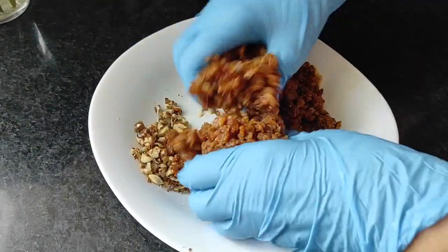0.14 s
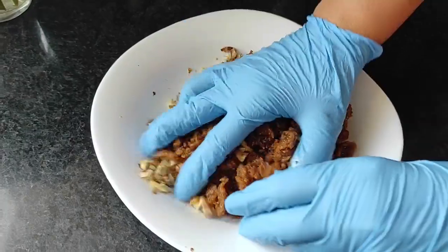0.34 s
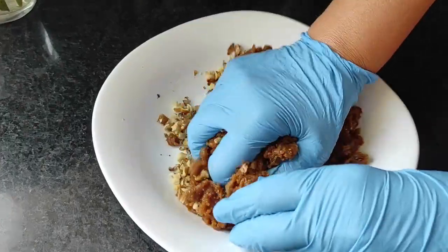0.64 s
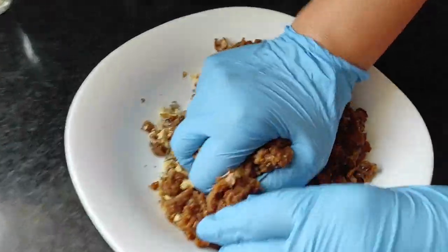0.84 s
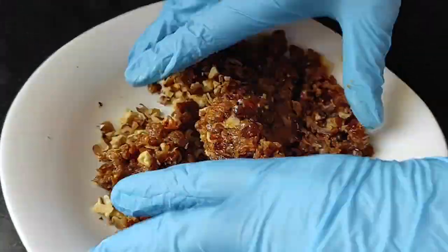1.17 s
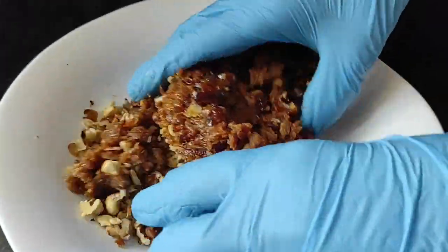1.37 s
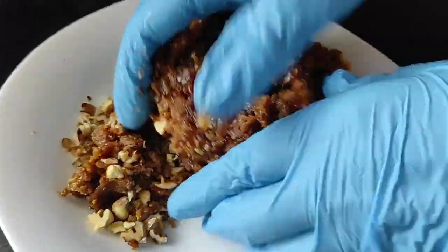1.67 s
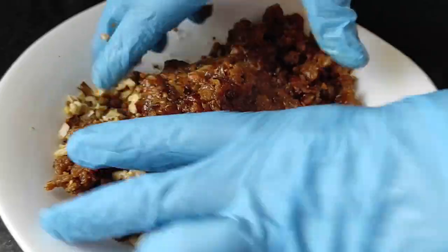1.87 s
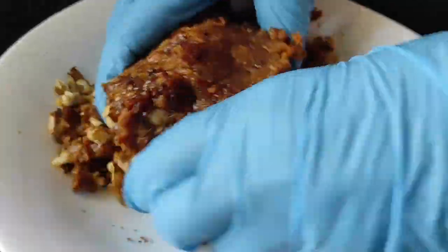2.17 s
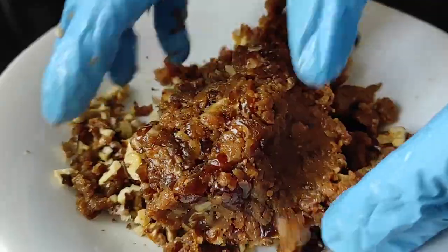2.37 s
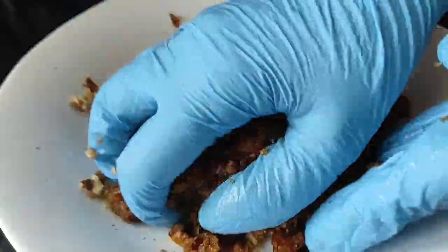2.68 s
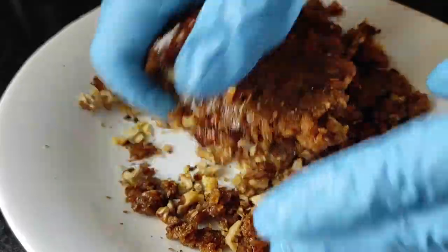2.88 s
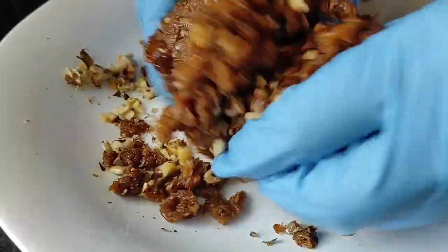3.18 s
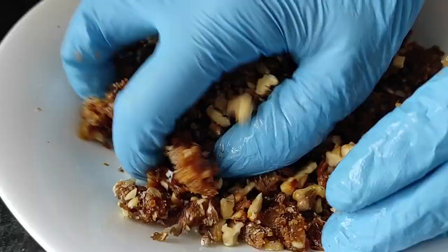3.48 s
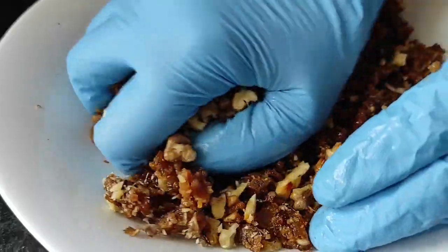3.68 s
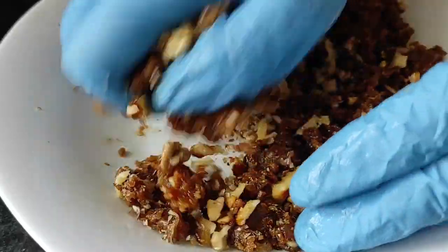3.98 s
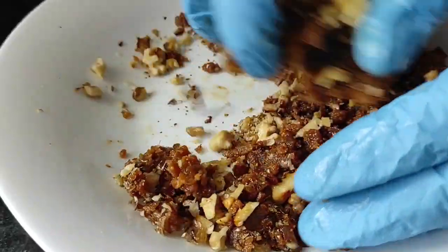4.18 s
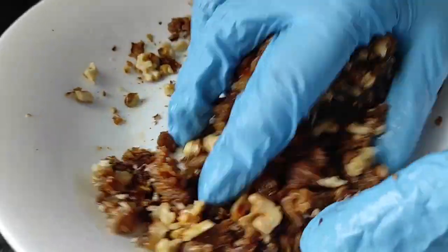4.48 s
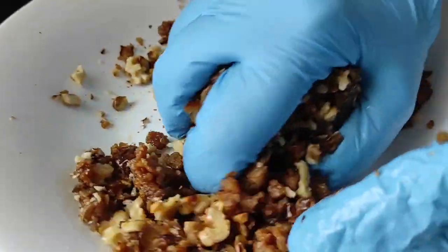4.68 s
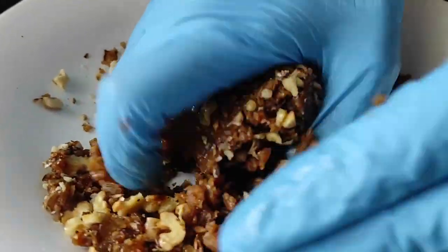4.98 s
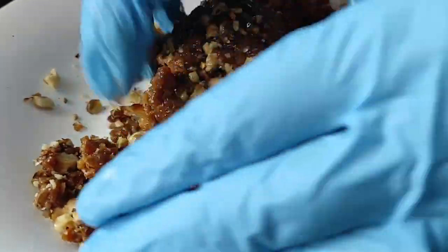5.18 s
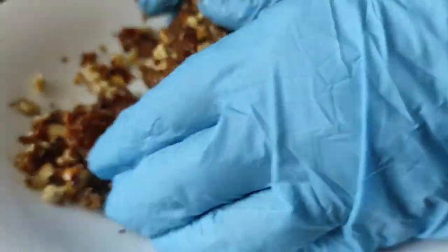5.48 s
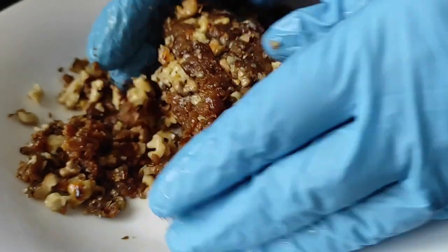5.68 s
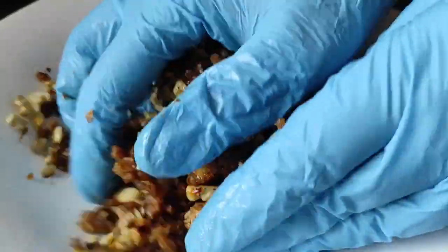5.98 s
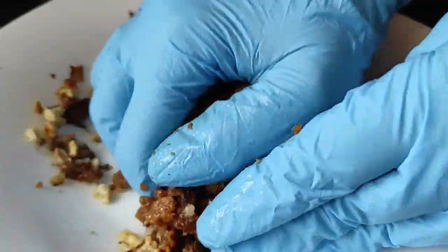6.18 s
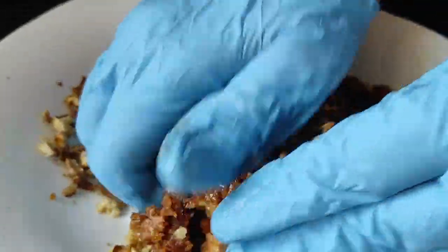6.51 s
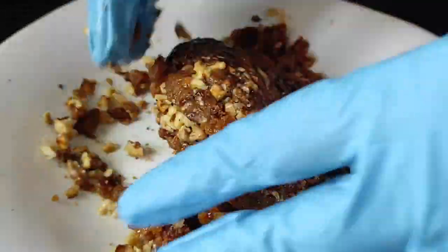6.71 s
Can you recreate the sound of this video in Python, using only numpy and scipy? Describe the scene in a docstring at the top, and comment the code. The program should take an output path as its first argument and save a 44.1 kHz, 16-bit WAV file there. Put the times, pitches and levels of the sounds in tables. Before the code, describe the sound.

Close stereo pickup in a quiet kitchen. Gloved fingers squeeze sticky paste in short, uneven strokes that fizz with tiny crackles and faint squelches. Crumbs scrape and nuts clink on a ceramic plate, and sticky threads tick as they part. Now and then the loose gloves rustle and snap with a new grip, loudest around five seconds, then softer kneading resumes.

```python
"""Gloved hands knead a sticky paste of dried fruit and nuts on a ceramic plate, close to the microphone in a kitchen.
From the start squeezes fizz with tiny sticky crackles (random impulses through spectra) over faint room air;
crumbs scrape and nuts clink (the plate's resonances), and threads tick (short pops) as they part.
From about 1 s each new grip rustles and snaps the loose gloves, and rubber creaks; then lumps thud softly,
rubber squeaks faintly (gliding tones) and hard nuts grind on the glaze. The loudest grip comes at about 5 s."""
import sys
import numpy as np
from scipy import signal
from scipy.fft import rfft, irfft, next_fast_len
from scipy.io import wavfile
from scipy.ndimage import map_coordinates

SR = 44100
rng = np.random.default_rng(int(sys.argv[2]) if len(sys.argv) > 2 else 0)


def digitize_waveform(pressure):
    """Quantize a signal to 16-bit integers and store it at the path in sys.argv[1].

    Rows of a 2-D input are taken as channels; values are limited to [-1, 1].
    """
    field = np.atleast_2d(pressure).T
    bounded = np.clip(field, -1, 1)
    quanta = np.round(bounded * 32767).astype(np.int16)
    wavfile.write(sys.argv[1], SR, quanta)


N = 302085

# Levels in the tables are relative; each source trims them before the mix.
# the air of the still kitchen: (frequency [Hz], density [dB per Hz])
AIR = [(20, 11), (50, -4), (100, -4), (200, -2), (330, -6), (600, -13.5), (1200, -18), (3000, -20.5),
       (6000, -12), (9000, -18.5), (10500, -36), (15500, -53)]
AIR_DB = -66.5
# how alike the air is at left and right: (frequency [Hz], likeness [0-1])
AIR_ALIKE = [(60, 0.42), (250, 0.74), (700, 0), (2000, 0)]
# the faint low drone, which steps up once: (frequency [Hz], density [dB per Hz])
DRONE = [(50, -12), (73, 8), (105, -33), (300, -64)]
DRONE_DB, DRONE_STEP_DB, DRONE_STEP_S = -84.5, 10, 4.03
# boom of the counter: (frequency [Hz], density [dB per Hz])
BOOM = [(110, -21), (160, 2), (215, -2.5), (330, -27.5)]
BOOM_DB, BOOM_REST_DB = -10.5, -73.5  # relative to the blows on the plate, and under the hands' bare weight
# the fingers squeeze the paste: (start [s], length [s], crackle level [dB], growth over the squeeze [dB],
# fizz relative to crackle [dB], squelch relative to crackle [dB])
SQUEEZES = [(-0.03, 0.35, -55.5, -16, -14, -7), (0.346, 0.2, -59, 5.5, -2, -11),
            (0.58, 0.26, -54.5, -3, -9, -16), (1.084, 0.094, -82, 0, -25, 4),
            (1.302, 0.22, -57.5, -1, -9, -6.5), (1.558, 0.26, -66, 5, -11, 3),
            (2.024, 0.22, -55, -5.5, -6.5, -17), (2.24, 0.15, -62, 0, -8, -7),
            (2.512, 0.23, -61.5, 8.5, -9.5, -9), (2.943, 0.26, -60.5, 2.5, -16, -3),
            (3.215, 0.29, -57, -2.5, -21, -3.5), (3.559, 0.27, -55, 2, -10, -12),
            (4.018, 0.12, -60, 4.5, -16, -3), (4.21, 0.047, -73, 12, -28, -1),
            (4.357, 0.031, -55.5, 1.5, -9, -19), (4.458, 0.17, -61.5, 6.5, -12, -11),
            (4.631, 0.28, -57, 2.5, -13.5, -7.5), (5.13, 0.46, -66.5, 5, -8, -1),
            (5.515, 0.26, -72.5, 15, -13, -3), (5.864, 0.36, -62, 3.5, -6.5, -1.5),
            (6.18, 0.23, -63, 8, -22, -8), (6.676, 0.19, -69.5, -2, -13, 10.5)]
SQUEEZE_ATTACK_S, SQUEEZE_RELEASE_S = 0.024, 0.031
SQUELCH_REST_DB, CRACKLE_REST_DB = -69.5, -68  # the paste settles under resting hands, before trims
STICK_SLIP_DB = 2.5  # the rubber sticks and slips: spread of the level wobble
# crackle of paste peeling off rubber: (frequency [Hz], density [dB per Hz])
PASTE = [(400, -44), (900, -7), (1450, -1), (1900, 0.5), (3000, -1.5), (4400, -2.5), (5600, 1.5),
         (6700, 4.5), (7600, -1), (9000, -6), (10000, -22), (15500, -38)]
# highest fizz, also the sharp edge of pops: (frequency [Hz], density [dB per Hz])
FIZZ = [(7000, 2), (9500, 0.5), (12000, 4), (15500, 1)]
# squelch under the palm: (frequency [Hz], density [dB per Hz])
SQUELCH = [(90, 4.5), (170, -4), (400, -5.5), (700, -5.5), (1200, -7), (1800, -21), (3500, -56)]
# air pockets bursting in the paste: (frequency [Hz], density [dB per Hz])
WET = [(450, 0.5), (1000, 12), (2100, -15), (3200, 10.5), (4500, -31)]
# tail of the kitchen: (frequency [Hz], time to fall 60 dB [s])
KITCHEN = [(150, 0.81), (1500, 0.26), (6000, 0.39), (14000, 0.11)]
# crumbs dragged over the plate: (start [s], length [s], level [dB], upper resonances relative to it [dB])
SCRAPES = [(0.185, 0.1, -62, -1.5), (0.632, 0.23, -65, -8), (1.333, 0.27, -66.5, -1), (1.7, 0.2, -64, -6),
           (2.076, 0.12, -63.5, -3), (2.333, 0.073, -60.5, 0.5), (2.66, 0.31, -66, -6),
           (2.94, 0.57, -62.5, -8), (3.704, 0.061, -59.5, 5.5), (4.065, 0.045, -55, -15),
           (4.228, 0.029, -58, -23), (4.288, 0.085, -71, -17), (4.443, 0.19, -60.5, -7),
           (4.807, 0.12, -62, -2), (5.675, 0.089, -68, -8), (6.093, 0.1, -63, -1), (6.339, 0.073, -62.5, 2)]
# plate resonances damped by the hands, low: (frequency [Hz], width [Hz], level [dB])
DAMPED_LOW = [(2043, 170, 2)]
# plate resonances damped by the hands, high: (frequency [Hz], width [Hz], level [dB])
DAMPED_HIGH = [(3590, 230, -8), (4440, 160, -22), (6180, 140, -8)]
LOAD_DETUNE = 0.021  # the shifting weight of the hands moves these resonances up or down by at most this share
# nuts knocking the plate: (time [s], level [dB], low modes relative [dB], middle modes relative [dB],
# high modes relative [dB], strongest high mode [Hz], share of the full ring length [0-1])
CLINKS = [(0.194, -43, -4, -20, -19, 6400, 0.43), (0.2986, -40.5, -16, -9, -12, 5560, 0.4),
          (0.306, -32, -12, -3.5, -11, 5650, 0.12), (1.699, -54, 4, -20, -30, 6500, 0.32),
          (1.7122, -53, 0.5, -11, -28, 6500, 0.5), (1.7444, -35.5, -12, -8, -12, 6100, 0.36),
          (1.84, -39, -22, -8, -11, 5900, 0.16), (2.4678, -35.5, -23, -11.5, -7, 7330, 0.81),
          (2.5875, -42.5, -35, -23, -10.5, 7650, 0.7), (3.0552, -28, -8, -4.5, -8.5, 6040, 0.24),
          (3.4364, -37.5, -14, -31, -5, 7140, 0.48), (4.166, -37.5, -20, -21, -12.5, 6130, 0.33),
          (4.218, -28, -2.5, -9.5, -16.5, 6000, 0.21), (4.2268, -44, -9, -6, -13, 5900, 0.29),
          (4.238, -43.5, -2, -7, -22, 6000, 0.36), (4.2705, -43, -0.5, -31, -31, 5900, 0.44)]
# modes of the bare plate: (frequency [Hz], level when struck [dB], level when rubbed [dB],
# time to fall 60 dB [s])
PLATE = [(1065, -21, 2.5, 0.041), (2045, 12, 7.5, 0.087), (2710, 3, -6, 0.028), (3650, 8, 5, 0.1),
         (4070, 7.5, -30, 0.042), (4790, -6, 0, 0.054), (5460, -10, -7, 0.04), (5790, 16, 10, 0.11),
         (6020, 15.5, -14, 0.11), (6640, 19, 12, 0.065), (7220, 16, -13, 0.037), (8000, 12, 2, 0.086),
         (8000, 5, -14, 0.06), (9000, 4, -2, 0.045)]
SPOT_DB_PER_OCTAVE = 43  # the spot that is hit favours one high mode; its neighbours fall away by this much
# dry crack of each knock: gain relative to its high modes, decay, and rise of the whole knock
CRACK, CRACK_T60_S, KNOCK_RISE_S = 2.4, 0.02, 0.0004
# sticky threads parting: (time [s], peak level [dB], pitch [Hz], rise [s], sharp edge relative [dB])
TICKS = [(0.8308, -42, 6900, .00025, -29), (1.0258, -26.5, 6600, 0.00049, -24),
         (1.0645, -36.5, 5670, 0.00062, -32), (1.4175, -38, 6840, 0.00044, -20),
         (2.63, -37, 6360, 0.00024, -10), (2.6463, -34.5, 6640, 0.0018, 6),
         (2.8464, -24, 6200, 0.00023, -35), (2.8585, -27, 5700, 0.00016, -32),
         (3.146, -35.5, 5500, 0.00032, -42), (3.5185, -37, 6570, 0.00027, -5),
         (3.777, -36, 5870, 0.00022, -30), (4.072, -33.5, 7400, 0.0006, -26),
         (4.0833, -38, 6500, 0.00022, -8), (4.125, -36.5, 5760, 0.00024, -37),
         (4.308, -41, 4930, 0.00034, -39), (4.3798, -31.5, 4710, 0.0012, -26),
         (4.7427, -28.5, 6330, 0.0003, -13), (4.892, -32.5, 4960, 0.00035, -43),
         (5.065, -18.5, 5400, 0.0014, -46), (5.0634, -28, 6900, 0.0011, -43),
         (5.0705, -25, 6500, 0.00081, -40), (5.0785, -22, 5500, 0.00041, -40),
         (5.662, -43, 6960, 0.0031, -35), (6.2625, -39, 6200, 0.00043, -34),
         (6.3554, -43, 6200, 0.00064, 10)]
# the hands take a new grip: (start [s], length [s], rustle level [dB], growth [dB], settling length [s],
# settling level [dB], low flutter relative to rustle [dB], crinkle relative to rustle [dB])
GRIPS = [(0.969, 0.068, -48, -3.5, 0.22, -50.5, -2, -3.5), (2.812, 0.069, -47.5, 7, 0.18, -64, -5, -4),
         (3.974, 0.048, -55, 8, 0.21, -66, -0.5, -3.5), (5.055, 0.037, -29.5, -0.5, 0.3, -50.5, -16.5, -10),
         (6.585, 0.064, -39, -2.5, 0.23, -50.5, -6, -7)]
GRIP_ATTACK_S, GRIP_RELEASE_S = 0.012, 0.013
REACH_S, REACH_DB = 0.064, -62.5  # the glove rustles faintly as the hand reaches for each grip
REGRIP_S, REGRIP_LENGTH_S, REGRIP_DB = 0.091, 0.026, -54  # the fingers close a moment after the grip starts
SETTLE_FALL_DB = 15  # the rubber goes on settling after each grip, fading by this much
# rustle of the gloves: (frequency [Hz], density [dB per Hz])
GLOVE = [(400, -21), (750, -12), (950, -4), (1180, -3.5), (1420, 3.5), (1680, -6), (1980, 0), (2400, -11),
         (2900, -18.5), (3500, -19), (4200, -23), (7000, -39)]
# low flutter of slack rubber: (frequency [Hz], density [dB per Hz])
FLUTTER = [(60, -50), (160, 5), (330, 8.5), (650, 5.5), (1100, 2), (2500, -58)]
# bright crinkle of the gloves: (frequency [Hz], density [dB per Hz])
CRINKLE = [(2500, 6.5), (4200, 1.5), (5600, 5), (6900, 6), (8500, -1.5), (10000, -16.5), (15500, -45)]
# side balance of the gloves, which face the right port: (frequency [Hz], left minus right [dB])
GLOVE_SIDE = [(300, -1), (900, 1.5), (1450, 0.5), (1850, -6), (2400, 2.5), (3200, -1), (4200, 0.5),
              (7000, 0.5)]
# the hands lift off the paste for a moment: (start [s], length [s])
LIFTS = [(0.906, 0.024), (1.213, 0.039), (1.893, 0.018), (3.902, 0.037), (4.057, 0.0066), (4.983, 0.026),
         (5.83, 0.017), (6.465, 0.011)]
LIFT_DB = -10  # squeezing, scraping and glove rustle dip to this meanwhile
# glove folds flipping over: (time [s], peak level [dB], pitch [Hz])
SNAPS = [(0.97, -30.5, 1860), (0.974, -31, 1520), (0.9812, -30, 1970), (0.9905, -30, 1500),
         (0.996, -34, 1930), (1.007, -32.5, 1920), (1.073, -36, 1630), (1.082, -37, 2820),
         (1.0815, -31, 1470), (1.195, -41.5, 2270), (2.393, -39, 1610), (2.8155, -31.5, 1920),
         (2.8524, -36, 1380), (2.8655, -31, 2100), (2.8825, -32, 2200), (2.8888, -24.5, 2380),
         (2.893, -27.5, 2080), (2.9105, -29, 2320), (3.4, -40, 2200), (3.456, -34, 2180),
         (3.9785, -31, 1350), (3.999, -34, 1390), (4.0045, -44, 1630), (4.0215, -29.5, 1570),
         (4.0665, -35, 1440), (4.076, -38, 1970), (4.1077, -34, 1920), (5.0435, -28, 2200),
         (5.05, -23, 1990), (5.053, -36, 2000), (5.0578, -17, 1960), (5.0638, -14.5, 1990),
         (5.0662, -15, 1900), (5.0735, -15.5, 1400), (5.0776, -12, 1500), (5.082, -25, 1340),
         (5.0885, -28, 1780), (5.096, -36, 1450), (5.11, -30, 2280), (5.1225, -36, 1500),
         (5.167, -44, 1980), (5.196, -37, 2440), (6.5915, -30, 1750), (6.598, -29, 2300),
         (6.6048, -28, 1550), (6.615, -34, 1720), (6.623, -28, 1550), (6.6302, -25.5, 3100),
         (6.634, -25, 2000), (6.6455, -29, 2100)]
# narrow ringing lines that colour the glove sounds: (frequency [Hz], level [dB], time to fall 60 dB [s])
RING_LINES = [(890, -8, .2), (1095, -9, .2), (1233, -8, .2), (1383, 0, .3), (1541, -1, .25),
              (1683, -2, .25), (1876, -1, .25), (1970, 3, .3), (2104, -3, .25), (2287, -3, .25)]
# the rubber pulls taut and creaks: (start [s], length [s], level [dB], growth [dB])
CREAKS = [(1.053, 0.036, -60, 0), (2.854, 0.02, -45.5, 4.5), (2.91, 0.045, -60, -8),
          (5.054, 0.075, -45.5, -14), (5.122, 0.18, -63, -24), (6.625, 0.021, -42.5, -4),
          (6.657, 0.035, -48, -0.5)]
# taut rubber: (frequency [Hz], density [dB per Hz])
TAUT = [(1500, -42), (2050, 1), (2500, -9), (2800, 3.5), (3250, 4), (3600, -13), (6000, -64)]
# lumps and palms landing: (time [s], peak level [dB], deep part relative [dB], wet smack relative [dB],
# time to fall 60 dB [s], smack pitch [Hz])
THUDS = [(1.271, -44, -5, -15, 0.044, 1140), (1.331, -43, -7, -12, 0.065, 990),
         (1.425, -55, 8.5, -1, 0.056, 834), (1.482, -42, -5, -8, 0.095, 1050),
         (2.048, -40, -6, -5.5, 0.077, 1160), (2.08, -49.5, -4, -1, 0.13, 990),
         (2.5545, -37, -2.5, 4, 0.09, 1280), (2.643, -43.5, -7, -1, 0.11, 1220),
         (3.085, -42.5, -2.5, -7, 0.091, 520), (3.143, -33, -11.5, -6, 0.079, 1310),
         (3.252, -35, -6.5, 0, 0.083, 1320), (3.456, -44.5, -9.5, -2, 0.089, 1040),
         (3.999, -35.5, -14, -3.5, 0.056, 730), (4.239, -42, -7, -10, 0.026, 1220),
         (5.073, -26.5, -11.5, -2.5, 0.058, 740), (5.88, -69.5, 14, -7, 0.43, 1000),
         (6.001, -47.5, 4.5, -2, 0.065, 1010), (6.057, -38, -8.5, -3.5, 0.16, 1190)]
# dull slap of a landing: (frequency [Hz], density [dB per Hz])
SLAP = [(250, -9), (600, 7.5), (1200, 5), (1600, 6), (2300, -11), (5000, -26)]
# slower thump below it: (frequency [Hz], density [dB per Hz])
THUMP = [(70, -26), (170, -0.5), (300, 5.5), (480, 5.5), (800, -27), (2000, -42)]
# low modes of the loaded plate on its counter: (frequency [Hz], width [Hz], level [dB])
HUM = [(205, 25, -9), (465, 33, -8), (646, 19, -1), (1017, 16, 10), (1215, 14, 6), (1332, 32, 0),
       (1610, 18, 4)]
# rubber dragging with a faint, hoarse pitch: (start [s], length [s], first pitch [Hz], last pitch [Hz],
# level [dB], roughness [0-1])
SQUEAKS = [(1.585, 0.33, 587, 648, -68, 0.1), (1.625, 0.064, 3470, 2360, -60, 0.2),
           (3.9735, 0.007, 2340, 1050, -47, 0.05), (5.113, 0.025, 2540, 2750, -41.5, 0.08),
           (6.569, 0.0091, 3040, 1000, -41.5, 0.26)]
# a nut ground along the bare, freely ringing plate: (start [s], length [s], low modes level [dB],
# middle modes level [dB], high modes level [dB])
GRINDS = [(2.552, 0.04, -80, -72, -79), (3.324, 0.013, -65, -56, -55), (3.36, 0.012, -55, -55, -50.5),
          (3.416, 0.027, -54, -64, -57), (3.441, 0.012, -57, -63, -43), (3.447, 0.034, -56, -62, -62)]
# the two microphone ports face different ways: (frequency [Hz], left minus right [dB])
PORTS = [(60, 1.5), (200, 4.5), (700, 3.5), (1200, -2), (2400, -5), (4400, -7), (8000, -9), (15000, -2.5)]
TOP_HZ = 15600  # band limit of the microphone signal


def amp(db):
    """Decibels to gain."""
    return 10 ** (np.asarray(db) / 20)


def unit(pair):
    """Scale a stereo pair so that its middle has rms 1."""
    return pair / np.sqrt(np.mean(pair.mean(0) ** 2) + 1e-20)


def along(points, hz):
    """(frequency [Hz], value) points read on a log axis."""
    f, v = np.transpose(points)
    return np.interp(np.log(hz + 1), np.log(f + 1), v)


def filtered(x, response):
    """x times a response of frequency, zero-padded against ringing that wraps round."""
    n = x.shape[-1]
    padded = next_fast_len(n + 8192)
    hz = np.fft.rfftfreq(padded, 1 / SR)
    return irfft(rfft(x, padded) * response(hz), padded)[..., :n]


def coloured(pair, spectrum):
    """A pair shaped by a spectrum with nothing far below its first point, at rms 1."""
    def response(hz):
        low_cut = np.minimum(hz / spectrum[0][0], 1) ** 2
        return amp(along(spectrum, hz)) * low_cut
    return unit(filtered(pair, response))


def resonate(x, modes):
    """x through a sum of resonances given as (frequency [Hz], width [Hz], level [dB])."""
    def response(f):
        return sum(amp(db) * 1j * f * width / (hz ** 2 - f ** 2 + 1j * f * width) for hz, width, db in modes)
    return filtered(x, response)


def panned(balance, hz):
    """Left and right gains of equal total power from (frequency [Hz], left minus right [dB]) points."""
    gains = amp(np.array([[1], [-1]]) * along(balance, hz) / 2)
    return gains / np.sqrt(np.mean(gains ** 2, axis=0))


def add(track, s, sound):
    """Mix a short sound into the track at time s."""
    start = max(round(s * SR), 0)
    part = sound[:, :N - start]
    track[:, start:start + part.shape[1]] += part


def wobble(rate):
    """A random curve of straight lines through normally spread knots, rate knots a second."""
    knots = rng.standard_normal(int(N * rate / SR) + 4)
    return map_coordinates(knots, [np.arange(N) * rate / SR], order=1)


def stroke(start, length, db, attack, release, growth_db=0):
    """Gain of one hand movement: it sets in, holds while the force grows or fades, and dies away."""
    t = np.arange(N) / SR - start
    onset = .5 + .5 * np.tanh(t / attack)
    fade = np.exp(-np.maximum(t - length, 0) / release)
    return onset * fade * amp(db + growth_db * np.clip(t / length, 0, 1))


def grains(rate, scatter_db, lag=0.00026, lag_spread=0.00015):
    """Random impulses of uneven size from all over the hands; most reach the right port first."""
    draw = rng.standard_normal((int(rate * N / SR), 3))
    right_at = rng.integers(0, N, len(draw))
    size = np.sign(draw[:, 0]) * amp(scatter_db * np.minimum(draw[:, 1], 2.5))
    delay = np.round((lag + lag_spread * draw[:, 2]) * SR).astype(int)
    left_at = np.clip(right_at + delay, 0, N - 1)
    return np.array([np.bincount(left_at, size, N), np.bincount(right_at, size, N)])


def pop(pitch, rise, rough, width, lag, edge_db):
    """A brief pop of peak 1: a few cycles at one pitch, blurred by noise around it, with a sharp edge on top."""
    t = np.arange(SR // 40) / SR
    age = np.maximum(t - np.array([[lag], [0]]), 0)  # the left port hears it later

    def band(hz):
        return 1 / (1 + (np.log2((hz + 1) / pitch) / width) ** 4)
    blur = unit(filtered(rng.standard_normal((2, len(t))), band))
    edge = amp(edge_db) * coloured(rng.standard_normal((2, len(t))), FIZZ)
    swell = age * np.exp(-age / rise)
    sound = swell * (np.sin(2 * np.pi * pitch * age) + rough * blur + edge)
    return sound / np.abs(sound).max(1).mean()


def air():
    """The still kitchen: noise partly alike at both ports in the bass and unlike above, and a shared low drone."""
    def mid_side(hz):
        turn = np.arccos(np.clip(along(AIR_ALIKE, hz), -1, 1)) / 2
        return np.array([np.cos(turn), np.sin(turn)])
    mid, side = filtered(rng.standard_normal((2, N)), mid_side)
    room = amp(AIR_DB) * coloured(np.array([mid + side, mid - side]), AIR)
    drone_db = DRONE_DB + DRONE_STEP_DB * (np.arange(N) / SR > DRONE_STEP_S)
    return room + amp(drone_db) * coloured(rng.standard_normal((1, N)), DRONE)


def counter(attack=0.0088, release=0.051, grip_db=-55):
    """Under the hands' weight plate and counter boom faintly, more at each grip and each landing lump."""
    blows = sum(stroke(s, attack, db + deep_db, attack, release) for s, db, deep_db, *_ in THUDS) * amp(-19.5)
    grips = sum(stroke(s, REGRIP_S, grip_db, attack, release) for s, *_ in GRIPS)
    level = np.hypot(amp(BOOM_REST_DB), amp(BOOM_DB) * (blows + grips))
    return level * coloured(grains(rate=1200, scatter_db=2.0), BOOM)


def squeezing():
    """Paste peels off the rubber in countless crackles; under the palm it squelches and small air pockets burst."""
    force = np.array([stroke(s, length, db, SQUEEZE_ATTACK_S, SQUEEZE_RELEASE_S, growth_db)
                      for s, length, db, growth_db, *_ in SQUEEZES])
    *_, fizz_db, squelch_db = np.transpose(SQUEEZES)[:, :, None]

    def total(relative_db):
        return np.linalg.norm(force * amp(relative_db), axis=0)
    peel = grains(rate=9000, scatter_db=4.5, lag=.00025, lag_spread=.00013)
    crackle_gain = np.hypot(total(0), amp(CRACKLE_REST_DB)) * amp(-1.89)
    crackle = crackle_gain * coloured(peel, PASTE)
    fizz = total(fizz_db) * amp(-7.5) * coloured(peel, FIZZ)
    squelch_gain = np.hypot(total(squelch_db), amp(SQUELCH_REST_DB)) * amp(-9.5 + 4.2 * wobble(rate=19))
    squelch = squelch_gain * coloured(grains(rate=700, scatter_db=0.5), SQUELCH)
    pockets = grains(rate=110, scatter_db=4)
    bursts = total(squelch_db) * amp(-14.5) * coloured(pockets, WET)
    return crackle + fizz + bursts + squelch


def kitchen(pair, delay=.006):
    """Hard walls answer after a few milliseconds with a noise tail, the bass lingering longest."""
    hz, t, z = signal.stft(rng.standard_normal((2, SR // 2)), SR, nperseg=256)
    decay = amp(-60 * t / along(KITCHEN, hz)[:, None])
    tail = signal.istft(z * decay, SR, nperseg=256)[1]
    tail = np.pad(tail / np.linalg.norm(tail[0]), ((0, 0), (round(delay * SR), 0)))
    return signal.fftconvolve(pair, tail, axes=1)[:, :N]


def scraping(attack=0.029, release=0.033):
    """Crumbs dragged over the glaze excite the plate's hand-damped resonances; harder ones reach the upper ones."""
    drag = sum(stroke(s, length, db, attack, release) for s, length, db, _ in SCRAPES)
    hard_drag = sum(stroke(s, length, db + upper_db, attack, release) for s, length, db, upper_db in SCRAPES)
    crumbs = grains(rate=400, scatter_db=3)
    load = .5 + .5 * np.tanh(2 * wobble(rate=14))  # 0 light, 1 heavy

    def tuned(modes, shift):
        return resonate(crumbs, [(hz * (1 + shift), width, db) for hz, width, db in modes])

    def loaded(modes):
        return unit((1 - load) * tuned(modes, LOAD_DETUNE) + load * tuned(modes, -LOAD_DETUNE))
    return amp(-5.0) * drag * loaded(DAMPED_LOW) + amp(-6.0) * hard_drag * loaded(DAMPED_HIGH)


def clinks(after_db=-27, after_stretch=3, lead_db=-20, lead_s=0.004):
    """A hard crumb scratches along, then rings the plate; the paste cuts the ring down to a faint after-ring."""
    t, out = np.arange(SR // 5) / SR, np.zeros((2, N))
    hz, struck_db, _, t60 = np.transpose(PLATE)[:, :, None]  # one row per mode
    for s, db, low_db, middle_db, high_db, spot_hz, length in CLINKS:
        colour_db = along([(2100, low_db), (3700, middle_db), (4400, middle_db), (5700, high_db)], hz)
        colour_db = colour_db - (hz > 5000) * SPOT_DB_PER_OCTAVE * np.abs(np.log2(hz / spot_hz))
        # the shifting load of hands and paste changes every mode a little from knock to knock
        colour_db = colour_db + rng.normal(0, 1.5, hz.shape)
        loaded_hz = hz * (1 + rng.normal(0, .009, hz.shape))
        phase = rng.uniform(0, 2 * np.pi, hz.shape) + rng.normal(0, 1.0, (2, len(hz), 1))
        fall_db = -60 * t / (t60 * max(length, .1))
        decay = amp(fall_db) + amp(after_db + fall_db / after_stretch)
        ring = amp(struck_db + colour_db) * decay * np.sin(2 * np.pi * loaded_hz * t + phase)
        grit = CRACK * amp(high_db) * coloured(rng.standard_normal((2, len(t))), PASTE)
        crack = grit * amp(-60 * t / CRACK_T60_S)
        knock = (ring.sum(axis=1) + crack) * (1 - np.exp(-t / KNOCK_RISE_S))
        # reversed in time, so that it swells up to the knock
        scratch = (grit * amp(lead_db) * np.exp(-t / lead_s))[:, SR // 50::-1]
        add(out, s, amp(db - 8) * knock)
        add(out, s - scratch.shape[1] / SR, amp(db) * scratch)
    return out


def ticks():
    """Single sticky threads part with a bright tick of a few cycles."""
    out = np.zeros((2, N))
    for s, db, pitch, rise, edge_db in TICKS:
        tick = pop(pitch, rise, rough=0.9, width=0.45, lag=.00016, edge_db=edge_db)
        add(out, s, amp(db + 1.5) * tick)
    return out


def gloves():
    """At each grip the slack rubber flutters, rustles and crinkles in quick clumps, then settles as fingers close."""
    out = np.zeros((2, N))
    folds = grains(rate=3000, scatter_db=2.0, lag=.00026, lag_spread=0.00018)
    rustle, flutter, crinkle = (coloured(folds, spectrum) for spectrum in (GLOVE, FLUTTER, CRINKLE))
    rustle = unit(rustle * amp(3.2 * wobble(rate=170)))
    for s, length, db, growth_db, settle_s, settle_db, flutter_db, crinkle_db in GRIPS:
        grab = stroke(s, length, db, GRIP_ATTACK_S, GRIP_RELEASE_S, growth_db)
        settle = stroke(s, settle_s, settle_db, GRIP_ATTACK_S, GRIP_RELEASE_S, -SETTLE_FALL_DB)
        rubber = rustle + amp(flutter_db) * flutter + amp(crinkle_db + 6.0) * crinkle
        out += amp(-7.0) * np.hypot(grab, settle) * rubber
        reach = stroke(s - REACH_S, REACH_S, REACH_DB, GRIP_ATTACK_S, GRIP_RELEASE_S)
        close = stroke(s + REGRIP_S, REGRIP_LENGTH_S, REGRIP_DB, GRIP_ATTACK_S, GRIP_RELEASE_S)
        out += (reach + close) * (crinkle + amp(-19.0) * rustle + amp(-12.0) * flutter)
    return out


def ringing_lines(pair, ring_db=-4):
    """Narrow lines ring on after the gloves."""
    modes = [(hz, np.log(1000) / (np.pi * t60), db) for hz, db, t60 in RING_LINES]
    return amp(ring_db) * resonate(pair, modes)


def snaps():
    """Folds of the glove flip over with a rough, rubbery pop."""
    out = np.zeros((2, N))
    for s, db, pitch in SNAPS:
        fold = pop(pitch, rise=.0009, rough=.5, width=.36, lag=.00038, edge_db=-62)
        add(out, s, amp(db - 3.5) * fold)
    return out


def creaks(attack=0.003, release=0.0078):
    """Stretched rubber slips over the fingers in a ragged run of tiny jerks."""
    pull = sum(stroke(s, length, db, attack, release, growth_db) for s, length, db, growth_db in CREAKS)
    jerks = grains(rate=520, scatter_db=3)
    return amp(-2.0) * pull * coloured(jerks, TAUT)


def thuds(rise=0.0028):
    """A soft lump lands: wet smack, dull slap and slower thump; plate and counter hum on in their low modes."""
    t, out = np.arange(SR // 4) / SR, np.zeros((2, N))
    slap = coloured(grains(rate=4200, scatter_db=5.0, lag=0.00028), SLAP)
    thump = coloured(grains(rate=4000, scatter_db=2, lag=0.00053), THUMP)
    for s, db, deep_db, smack_db, t60, smack_hz in THUDS:
        part = slice(round(s * SR), round(s * SR) + len(t))
        dull = slap[:, part] * amp(-11.5 - 60 * t / t60)
        deep = thump[:, part] * amp(deep_db - 8.5 - 60 * t / (1.9 * t60))
        smack = pop(smack_hz, rise=0.00098, rough=0.41, width=0.82, lag=0.00021, edge_db=-60)
        add(out, s, amp(db) * (1 - np.exp(-t / rise)) * (dull + deep))
        add(out, s, amp(db + smack_db) * smack)
    return out + resonate(out, HUM)


def squeaks():
    """Rubber sticks and slips at a gliding, unsteady rate."""
    out = np.zeros((2, N))
    for s, length, first_hz, last_hz, db, rough in SQUEAKS:
        count = round(length * SR)
        hz = np.linspace(first_hz, last_hz, count) * (1 + rough * wobble(rate=320)[:count])
        swell = np.sqrt(np.hanning(count)) * amp(db + 4 * wobble(rate=85)[:count])
        tone = swell * np.sin(2 * np.pi * np.cumsum(hz) / SR)
        add(out, s, tone[None])
    return out


def grinding(attack=0.0014, release=0.0072):
    """A hard piece of nut judders over the glaze where no hand damps it, and all the plate's modes sing."""
    out, judder = np.zeros((2, N)), grains(rate=1200, scatter_db=3)
    for band, (lo_hz, hi_hz) in enumerate([(0, 3000), (3000, 4500), (4500, SR / 2)]):
        modes = [(hz, np.log(1000) / (np.pi * t60), rubbed_db)
                 for hz, _, rubbed_db, t60 in PLATE if lo_hz < hz <= hi_hz]
        force = sum(stroke(s, length, levels[band], attack, release) for s, length, *levels in GRINDS)
        out += amp(-4.5) * force * unit(resonate(judder, modes))
    return out


def scene():
    """Hands, paste and plate close by, with the room's answer and its air."""
    lifted = sum(stroke(s, length, 0, .004, .006) for s, length in LIFTS)
    rubber = amp(LIFT_DB * lifted) * gloves() + snaps() + creaks()
    rubber = filtered(rubber, lambda hz: panned(GLOVE_SIDE, hz))
    stick_slip = amp(STICK_SLIP_DB * wobble(rate=38) + LIFT_DB * lifted)
    paste = stick_slip * (squeezing() + scraping()) + ticks() + thuds()
    near = rubber + paste + squeaks() + clinks() + grinding() + counter()
    return near + amp(-14.0) * kitchen(near) + ringing_lines(rubber) + air()


def record(dry):
    """The left port favours the bass, the right one the treble; nothing passes above the band limit."""
    return filtered(dry, lambda hz: panned(PORTS, hz) * (hz < TOP_HZ))


dry = scene()
out = record(dry)
digitize_waveform(out)
```